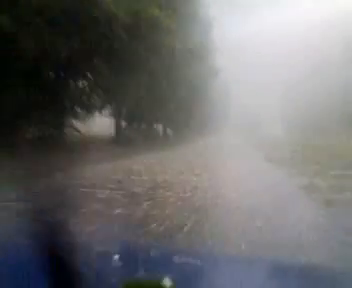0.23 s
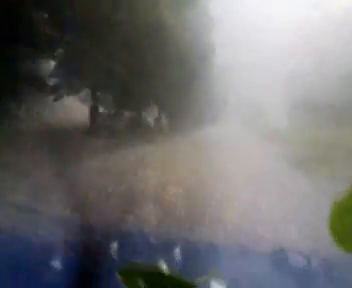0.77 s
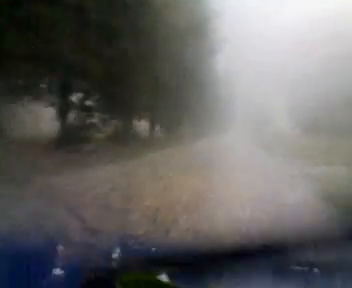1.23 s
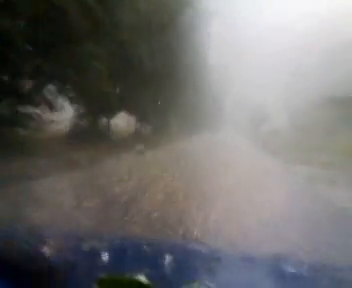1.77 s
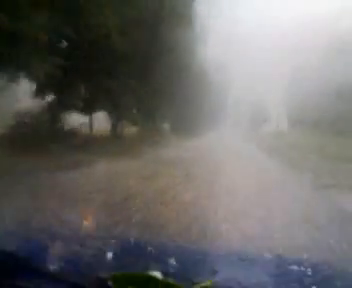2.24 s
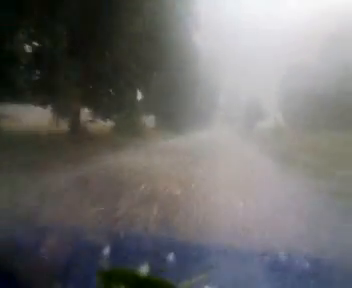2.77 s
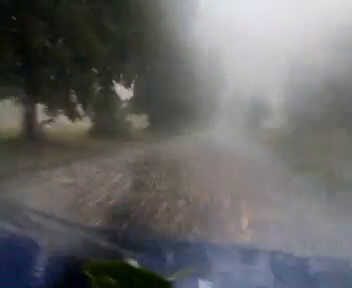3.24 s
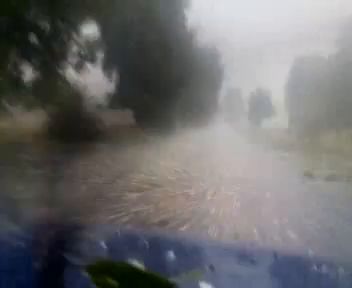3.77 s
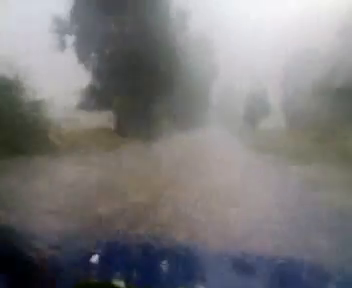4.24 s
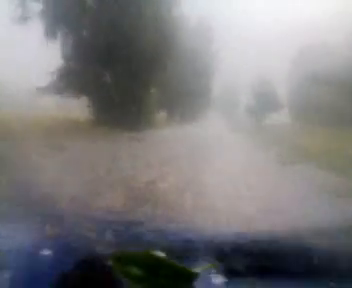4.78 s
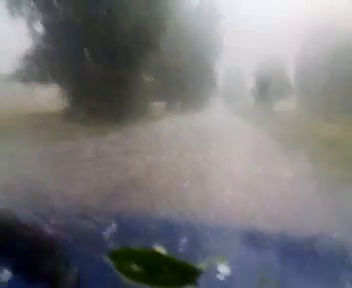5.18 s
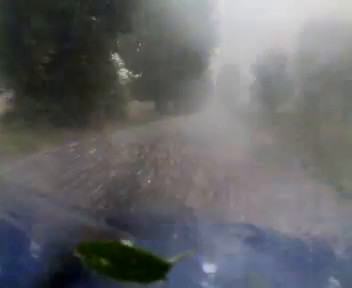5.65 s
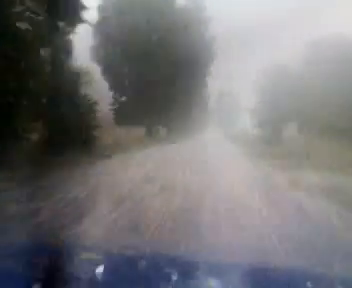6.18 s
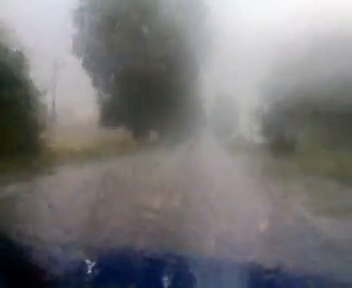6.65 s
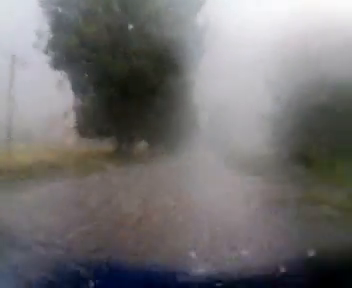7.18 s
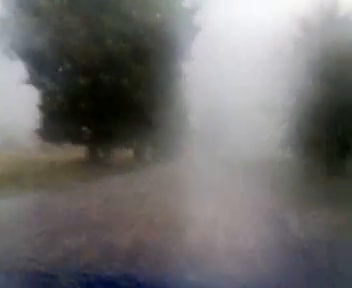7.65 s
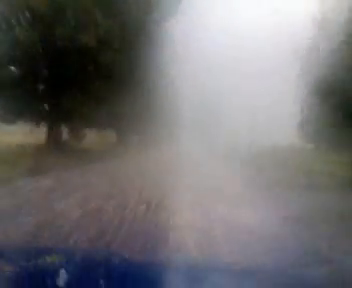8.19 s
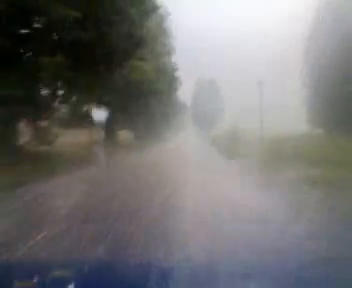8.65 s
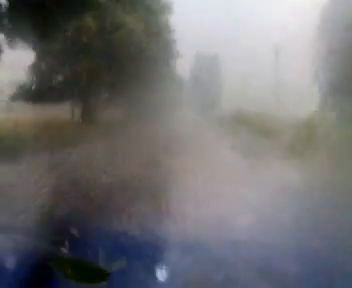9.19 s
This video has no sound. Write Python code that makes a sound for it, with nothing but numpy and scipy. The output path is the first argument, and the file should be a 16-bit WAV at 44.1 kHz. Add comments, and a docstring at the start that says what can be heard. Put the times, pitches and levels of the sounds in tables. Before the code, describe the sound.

Inside a moving car, hailstones crack and boom irregularly on roof and windscreen over a low engine hum, tyre rumble and faint rain hiss.

```python
"""Inside a car driving through a hailstorm: patchy noise makes the tyre rumble, random drops the rain hiss.
Stones crack on glass and boom on the roof throughout: enveloped noise, decaying panel modes and a sagging note.
The engine, a stack of sines, climbs for three seconds, falls in pitch through a gear change just after four,
then slowly picks up again. The biggest stones overload the microphone input."""
import sys
import numpy as np
from scipy import signal
from scipy.fft import rfft, irfft
from scipy.io import wavfile
from scipy.ndimage import uniform_filter1d

SR = 44100
rng = np.random.default_rng(int(sys.argv[2]) if len(sys.argv) > 2 else 0)


def materialize(psi):
    """Save the field psi as 16-bit PCM at rate SR to the path in sys.argv[1].

    A 1-D psi becomes a single channel; in a 2-D psi each row is a channel.
    """
    bounded = np.clip(np.atleast_2d(psi).T, -1, 1)
    quanta = np.round(bounded * 32767).astype(np.int16)
    wavfile.write(sys.argv[1], SR, quanta)


N = 415863


def from_db(db):
    """Decibels to gain."""
    return np.exp(np.asarray(db) * (np.log(10) / 20))


def rms_one(x):
    """Scale to unit rms."""
    return x / np.sqrt(np.mean(x ** 2) + 1e-20)


def in_time(rows):
    """Columns of a (time_s, ..) table, sample by sample."""
    time_s, *columns = np.transpose(rows)
    return [np.interp(np.arange(N) / SR, time_s, column) for column in columns]


def at_hz(points, hz):
    """Read (Hz, value) points on a log-frequency axis."""
    point_hz, values = np.array(points).T
    return np.interp(np.log(hz), np.log(point_hz), values)


def drift(rate_hz):
    """Slow chance: noise at every 40th sample through a double one-pole low-pass; rms 1."""
    step = 40
    pole = np.exp(-2 * np.pi * rate_hz * step / SR)
    noise = rng.standard_normal(N // step + 2002)
    slow = signal.lfilter([1], [1, -2 * pole, pole * pole], noise)[2000:]   # drop the filter's start-up
    return np.interp(np.arange(N) / step, np.arange(len(slow)), rms_one(slow))


def band_bank(sources):
    """Third-octave bands of rms 1 with their centres; neighbours come from different sources."""
    edges = 20 * 2 ** np.arange(0, 9, 1 / 3)
    bands = []
    for k, (low, high) in enumerate(zip(edges, edges[1:])):
        band_pass = signal.butter(2, [low, high], "band", fs=SR, output="sos")
        bands.append(rms_one(signal.sosfilt(band_pass, sources[k % 2])))
    return np.sqrt(edges[1:] * edges[:-1]), np.array(bands)


def coloured(sources, spectrum, patchy_db):
    """Bands set to a spectrum, flickering partly together and partly alone; rms 1."""
    centres, bands = band_bank(sources)
    together = drift(23.0)
    total = np.zeros(N)
    for hz, band in zip(centres, bands):
        flicker_db = patchy_db * (1.15 * together + drift(9.2))
        # the root of frequency turns level per Hz into level per third octave
        total += band * np.sqrt(hz) * from_db(at_hz(spectrum, hz) + flicker_db)
    return rms_one(total)


def road(level_db):
    """Tyre rumble: low-heavy noise whose bands flicker."""
    # rumble spectrum: pitch_hz, relative level_db (per Hz)
    rumble = [(18, -28.5), (28, -0.5), (45, 2.5), (65, -4.5), (90, -1.5), (118, -9.5), (155, -5),
              (210, -8.5), (275, -10.5), (330, -15), (570, -20.5), (900, -25), (1300, -30.5), (2000, -79.5)]
    return from_db(level_db) * coloured(rng.standard_normal((2, N)), rumble, patchy_db=1.6)


def rain(level_db):
    """Thousands of drops a second, of uneven size, blend into hiss; a steep low-pass keeps it below about 7.5 kHz."""
    # hiss spectrum: pitch_hz, relative level_db (per Hz)
    hiss_spectrum = [(290, -17.5), (500, 4.5), (780, -15.5), (847, -24.5), (1220, -17), (1350, -8.5),
                     (2570, -13.5), (4570, -13.5), (7040, -24), (8200, -34.5), (10700, -83), (18000, -120)]
    size_db = np.minimum(rng.exponential(1, (2, N)), 5)
    sizes = from_db(size_db) * rng.choice([-1, 1], (2, N))
    drops = sizes * (rng.random((2, N)) < 4000 / SR)   # drops a second in each of two streams
    hiss = from_db(level_db) * coloured(drops, hiss_spectrum, patchy_db=.5)
    return signal.sosfilt(signal.ellip(8, .5, 50, 7450, fs=SR, output="sos"), hiss)


def engine():
    """Low multiples of the firing rate, each wavering a little; their balance changes with the gear."""
    # engine path: time_s, firing_hz, load_db
    path = [(0, 53.3, -0.5), (1.2, 58.4, 1), (2.2, 62.14, -4), (3.1, 65.94, -5), (4.0, 66.1, -18),
            (4.35, 59.6, -19), (4.7, 42.5, -13), (5.9, 43.3, -7), (7.7, 47.46, -2), (8.6, 46.63, -1),
            (9.43, 48.93, -2)]
    # harmonics heard: multiple of the firing rate
    multiples = (1, 2, 4, 5, 6)
    # level_db of each multiple before and after the shift, load added on top
    low_gear_db = [-21.5, -37, -33.5, -31.5, -41.5]
    high_gear_db = [-34, -30, -39, -46.5, -35.5]
    shift_s = 4.4
    firing_hz, load_db = in_time(path)
    turns = np.cumsum(firing_hz * (1 + 0.00404 * drift(2.585))) / SR
    in_low_gear = np.arange(N) < shift_s * SR
    hum = np.zeros(N)
    for multiple, low_db, high_db in zip(multiples, low_gear_db, high_gear_db):
        level_db = np.where(in_low_gear, low_db, high_db) + load_db + 0.42 * drift(1.8)
        hum += np.sqrt(2) * from_db(level_db) * np.sin(2 * np.pi * (multiple * turns + rng.random()))
    return hum


def stones():
    """Blows on roof and glass plus faint random pellets, all in the roof's columns with crack_s added."""
    # roof blows: start_s, crack_db (1.5-4 kHz), edge_db (4-8 kHz), clang_db (0.4-1.5 kHz),
    # boom_db (200-400 Hz), drum_db (under 170 Hz), note_hz (struck spot), note_db (lift), ring_s (base t60);
    # edge, clang and boom are relative to the crack, drum to the boom
    roof_hits = [(0.2526, -25.5, -10, -3, -15, -8, 508, 9, 0.86),
                 (0.3133, -32.5, -18, -8, 2, -8, 550, 1.5, .4),
                 (0.3577, -26, -27, -1.5, 15.5, -2, 420, 2, 0.1),
                 (0.503, -11.5, -12, -10, -12.5, -3.5, 440, 10.5, 0.63),
                 (0.571, -27, -6, 7.5, 16, 2, 520, 12, 0.23),
                 (0.678, -22, -19, 10, 12.5, -12, 550, 11.5, 0.32),
                 (0.9668, 0.5, -15.5, -18, -24, -4.5, 1150, 9, 0.58),
                 (1.2125, -11, -9, 6, 3.5, -15, 356, 7.5, 0.46),
                 (1.3037, -2.5, -15, -5, -9, -2, 458, 2, 0.63),
                 (1.523, -7.5, -9, -9, -2.5, -1, 415, 15.5, 0.1),
                 (1.8565, -27.5, -9, -3.5, 0.5, -10, 468, 13, .29),
                 (2.145, -12.5, -44, 3, -7, 0, 1260, 6.5, 0.12),
                 (2.235, -5, -23, -24, -10, 1.5, 503.6, 11.5, 0.28),
                 (2.323, 3, -27, -4.5, -5.5, 1, 945, 4, 0.62),
                 (2.5235, -8.5, -16, -27, -2, -1, 863, -2, 0.13),
                 (2.589, -7, -13.5, -15.5, -11.5, -2, 490, 15, 0.27),
                 (2.8835, -15, -20, 11.5, 12, -7, 442, 3, 0.56),
                 (3.269, -4, -9.5, -4, 0, -2, 372, -0.5, 0.65),
                 (3.5444, -5.5, -10.5, -1.5, -2, -4, 392, 6.5, 0.62),
                 (3.751, -5.5, -15, -12, -48, -4, 1303, 9, .56),
                 (4.1557, -11, -8, -1, 5, -5.5, 976, 3.5, 0.77),
                 (4.258, -8.5, -23, -16, -5, -10, 1600, 6, 0.12),
                 (4.7212, -3, -6.5, -4.5, -1, -9, 1437, 3.5, 0.69),
                 (5.1371, -13.5, -12, -3, 2, -6, 488, 11, 0.12),
                 (5.2201, 1.5, -8, -7, -5.5, -8, 1173, 2.5, 0.72),
                 (5.263, -26, -40, 8.5, 3, -7, 1137, 12, 0.46),
                 (6.2779, -24, -14, -16, -1, 2, 1510, 11.5, 0.23),
                 (6.369, -19, -15, -13.5, -2, -6, 513, 11, 0.13),
                 (6.4449, -1.5, -9.5, -4, -6.5, -6, 470, 3, 0.61),
                 (6.6863, -7.5, -31, -13, -13.5, -5.5, 1493, 7, 0.38),
                 (6.8006, -7, -13.5, -14, -12, -4, 1160, 2.5, 0.31),
                 (6.8492, -12, -7.5, 3.5, -5.5, -1, 1488, 1.5, 0.087),
                 (7.0246, -9.5, -12, -6.5, -3, -16, 473, 9.5, 0.36),
                 (7.075, -41, -21, -1, 14, -7, 560, 21, 0.42),
                 (7.1681, -0.5, -11, -5, -9.5, -8, 1008, 0.5, 0.61),
                 (7.228, -1, -19, -11.5, -6.5, 0.5, 1204, 8, 0.73),
                 (7.4467, -19, -16, -10.5, -11, -8, 428, 2, 0.56),
                 (7.8342, -21, -23, 3, -11, -5, 460, 8, 0.28), (8.0753, -32, -11, 8.5, 1, -7, 466, 11, 0.2),
                 (8.1545, 3.5, -20, -5.5, -9.5, -2, 933, 1.5, 0.6),
                 (8.4286, -28.5, 4, 16.5, 11.5, 0, 377.5, 14, 0.18),
                 (9.4065, -16, -30, 1, -12, 1, 828, 11, .7)]
    # glass blows: start_s, crack_db, edge_db (relative to the crack), crack_s (t60)
    glass_hits = [(0.53, -18, -11, 0.072), (0.668, -10.5, -15, 0.061), (0.8314, -27.5, 1, 0.053),
                  (1.187, -13, 4, .041), (1.729, -13, -16, 0.17), (2.017, -11, -12, 0.042),
                  (2.7594, -11, -10.5, 0.047), (2.9844, -21.5, 1, 0.03), (3.2412, -8, -1.5, 0.055),
                  (3.5101, -8.5, -22, .048), (3.643, -34, 9, 0.027), (3.8292, -28, 3.5, 0.041),
                  (3.9587, -20, 0, 0.036), (4.49, 3, -5, 0.051), (5.399, -26.5, -8, 0.034),
                  (5.5319, -32, 2.5, .06), (6.535, -11.5, -0.5, 0.041), (6.6102, -34, -11, 0.068),
                  (7.5577, -29.5, -7, 0.1), (7.6631, -23, -6, 0.041), (8.5101, 1, 0.5, 0.041),
                  (8.8129, -31, -4, .12), (8.8424, -30, -7, .05)]
    # a long ring goes with a long crack
    roof = [(*row, 0.073 + 0.087 * row[-1]) for row in roof_hits]
    pellets_per_s = 1.5
    draws = rng.random((60, 2))
    times = np.cumsum(-np.log(1 - draws[:, 0])) / pellets_per_s
    pellets = [(start_s, -36.5 + 1.5 * (2 * u - 1), -6, 0.069)
               for start_s, u in zip(times, draws[:, 1]) if start_s < (N - 1) / SR]
    # glass hardly moves the panel: clang_db, boom_db, drum_db, note_hz, note_db, ring_s
    glass_body = (-24.5, -16.5, -6.5, 3600, 4, 0.18)
    glass = [(start_s, crack_db, edge_db, *glass_body, crack_s)
             for start_s, crack_db, edge_db, crack_s in glass_hits + pellets]
    return roof + glass


def crack(t, t60):
    """Envelope of the bursting stone: a 2 ms rise and an exponential fall."""
    return (1 - np.exp(-t / 0.002)) * from_db(-60 * t / t60)


def panel_ring(hz, t, ring_s):
    """Envelope at each frequency: bending waves spread faster when high, so the lows swell late."""
    # the treble of the panel dies first: pitch_hz, decay time (share of ring_s)
    ring_length = [(200, 1.2), (700, .9), (1300, 1.0), (1800, .72), (2400, .53), (3500, .38)]
    swell_s = 0.00067 * (1000 / hz) ** 1.95
    t60 = ring_s * at_hz(ring_length, hz)
    return (1 - np.exp(-t / swell_s[:, None])) * from_db(-60 * t / t60[:, None])


def mode_cloud():
    """Modes too many to count: noise whose spectrum is finely rippled, in bands from about 70 Hz up."""
    ripple_db, ripple_hz = 2.5, 33   # depth (rms) and smoothing width
    spectrum = rfft(rng.standard_normal((2, N)))
    width = max(round(ripple_hz * N / SR), 1)
    ripple = uniform_filter1d(rng.standard_normal(spectrum.shape[1]), width)
    ripple = rms_one(uniform_filter1d(ripple, width))
    hz, cloud = band_bank(irfft(spectrum * from_db(ripple_db * ripple), N))
    return hz[5:], cloud[5:]


def struck_note(t, note_hz, ring_s):
    """The dented spot rings sharp at first and sags in pitch as it relaxes."""
    turns = note_hz * np.cumsum(1 + 0.089 * np.exp(-t / .04)) / SR
    # swells and dies twice as fast as the panel
    envelope = panel_ring(np.array([note_hz]), t / 0.5, ring_s)[0]
    return envelope * np.sin(2 * np.pi * turns)


def hail():
    """Each stone cracks, sounds the note of the spot it strikes and rings the roof modes and the mode cloud."""
    # roof panel modes: pitch_hz, level_db (before the overall trim), ring (relative; 0.65 is neutral)
    roof_modes = [(89.5, 8, 0.3), (158.3, 7, 0.53), (187.3, -0.5, 0.35), (220.7, -6.5, 0.63),
                  (240.6, -1.5, 0.43), (273.7, -10, 0.92), (382, -9, 1), (451.7, -5.5, 0.67),
                  (557, -11.5, 0.89), (550, -11, 0.21), (826, -38, 0.17), (868, -19, 0.8),
                  (965, -15.5, 0.78), (1063, -20, 0.35), (1099, -6.5, 0.33), (1070, -13.5, 0.92),
                  (1360, -14.5, 0.57), (1494, -18, 0.93), (1640, -25.5, 0.65), (1920, -14, 0.14)]
    mode_hz, mode_db, mode_ring = np.transpose(roof_modes)
    hz, cloud = mode_cloud()
    rows = stones()
    # where a stone lands favours some modes; each blow rings the modes at slightly different pitches
    spot_db = 2.5 * rng.standard_normal((len(rows), len(hz) + len(mode_hz)))
    tune = 1 + 0.01118 * rng.standard_normal((len(rows), len(mode_hz)))
    phase = rng.uniform(0, 2 * np.pi, (len(rows), len(mode_hz), 1))
    out = np.zeros(N)
    for k, row in enumerate(rows):
        start_s, crack_db, edge_db, clang_db, boom_db, drum_db, note_hz, note_db, ring_s, crack_s = row
        ring_s, crack_s = np.clip(ring_s, .04, 1.4), np.clip(crack_s, .02, .4)
        start = round(start_s * SR)
        length = round(max(ring_s, crack_s) * SR * 3 / 4)   # stop three quarters into the longer base t60
        t = np.arange(min(length, N - start)) / SR
        here = slice(start, start + len(t))

        # spectra of the burst and of the ring: (Hz, dB per third octave relative to the crack)
        low_db = boom_db + drum_db
        burst = [(300, -40), (900, -17), (3320, -11), (5380, edge_db + 0.5), (9000, edge_db - 59)]
        ring = [(80, low_db - 12.5), (244, boom_db - 10), (1120, clang_db - 11), (1700, clang_db - 15),
                (2600, clang_db - 19), (3800, clang_db - 25), (9000, clang_db - 50)]

        # noise bands near the struck note are lifted; the cloud varies less than single modes
        octaves_off = np.log2(hz / note_hz)
        favoured_db = note_db * np.exp(-.5 * (octaves_off / 0.22) ** 2) + .45 * spot_db[k, :len(hz)]
        shape = from_db(at_hz(burst, hz))[:, None] * crack(t, crack_s)
        shape += from_db(at_hz(ring, hz))[:, None] * panel_ring(hz, t, ring_s)
        out[here] += from_db(crack_db + favoured_db) @ (shape * cloud[:, here])

        # single modes of the panel
        blow = [(95, low_db - 0.5), (160, low_db), (200, boom_db), (350, boom_db), (500, clang_db)]
        struck_db = crack_db + at_hz(blow, mode_hz) + mode_db - 4.5 + spot_db[k, len(hz):]
        sines = np.sin(2 * np.pi * (mode_hz * tune[k])[:, None] * t + phase[k])
        mode_envelopes = panel_ring(mode_hz, t * 0.65 / mode_ring[:, None], ring_s)
        out[here] += from_db(struck_db) @ (mode_envelopes * sines)

        note_gain = from_db(crack_db + at_hz(ring, note_hz) + note_db + 1.0)
        out[here] += note_gain * struck_note(t, note_hz, ring_s)
    return out


def scene():
    """Hail over engine, road and rain."""
    # the steady storm: time_s, rumble_db, rain_db
    storm = [(0, -25.5, -43), (.8, -25, -37.5), (1.9, -22.5, -41), (3.1, -21, -40.5), (4.0, -24, -41),
             (6.0, -24.5, -40), (7.0, -27, -40), (7.9, -21.5, -37.5), (8.8, -24, -40), (9.43, -25, -41.5)]
    rumble_db, rain_db = in_time(storm)
    return (road(rumble_db) + rain(rain_db) + engine() + hail())[None]


def record(dry):
    """The input flattens at its limit, the treble rolls off and the top is cut."""
    limit, treble_hz, cutoff_hz = .67, 7200, 8800
    flat = dry / (1 + np.abs(dry / limit) ** 8) ** (1 / 8)
    dull = signal.sosfilt(signal.butter(7, treble_hz, fs=SR, output="sos"), flat)
    return signal.sosfilt(signal.ellip(8, .5, 60, cutoff_hz, fs=SR, output="sos"), dull)


dry = scene()
out = record(dry)
materialize(out)
```